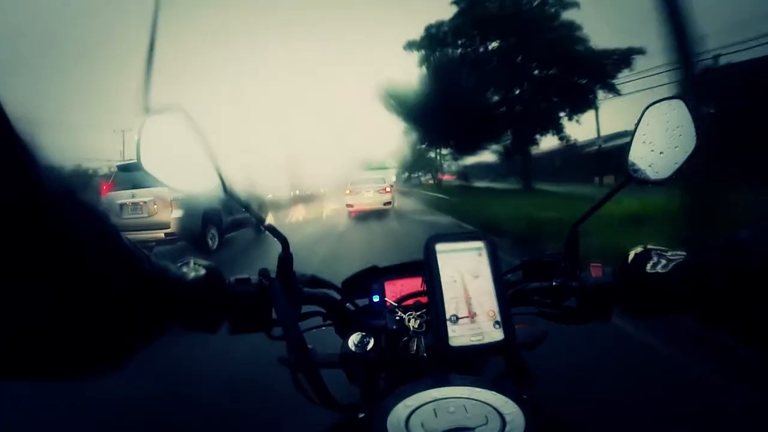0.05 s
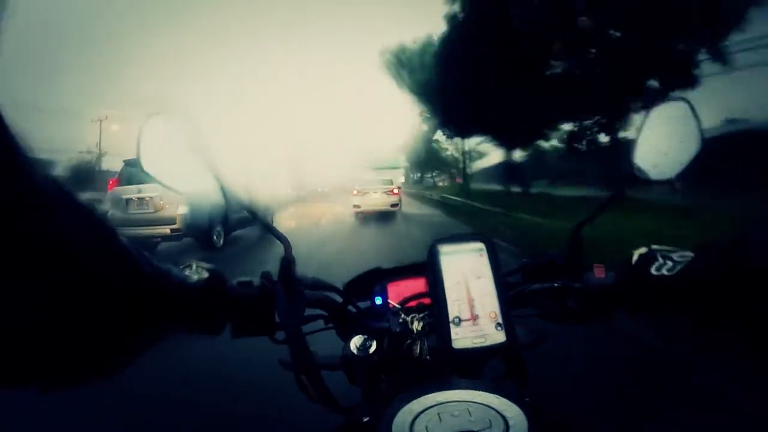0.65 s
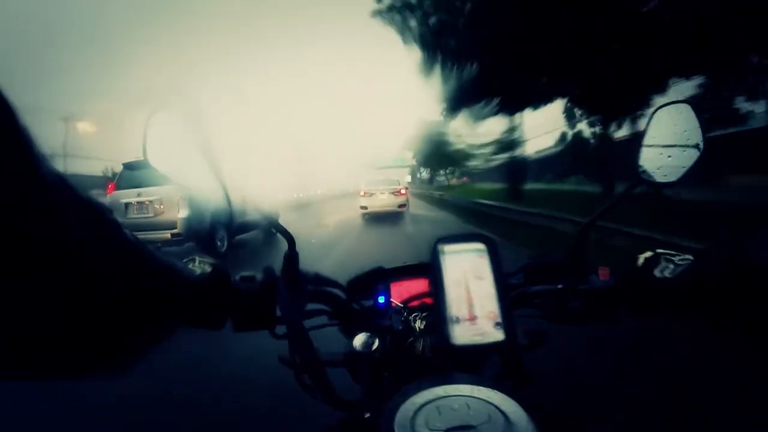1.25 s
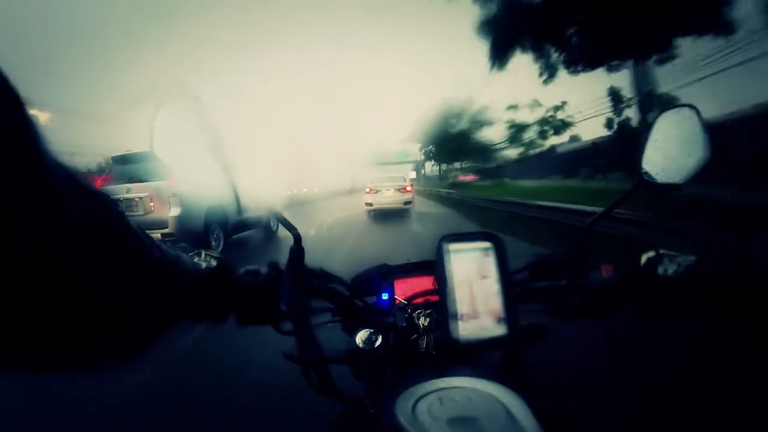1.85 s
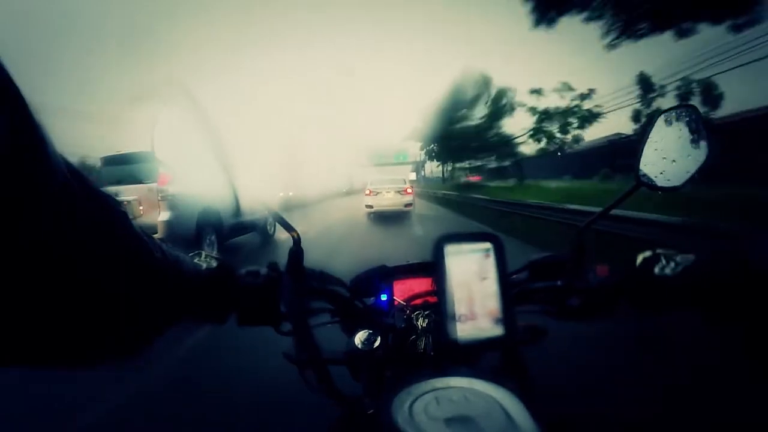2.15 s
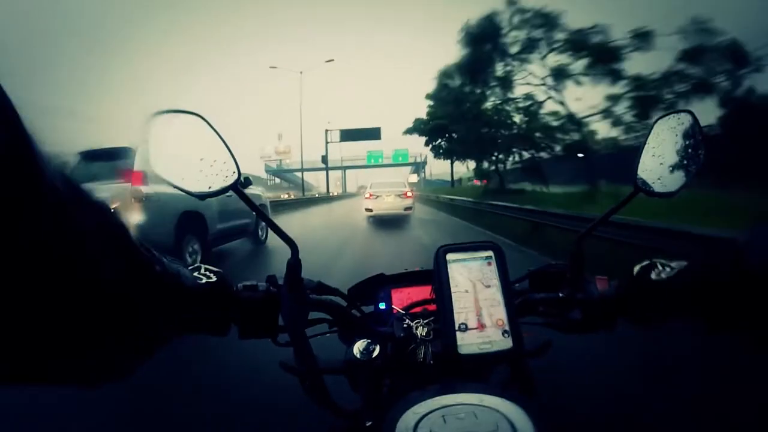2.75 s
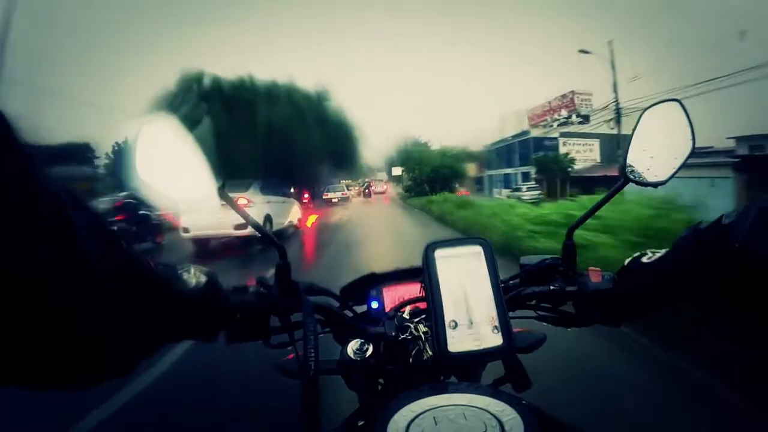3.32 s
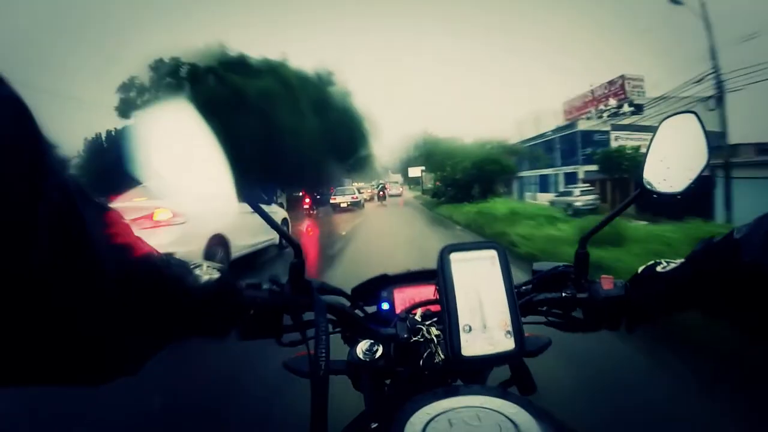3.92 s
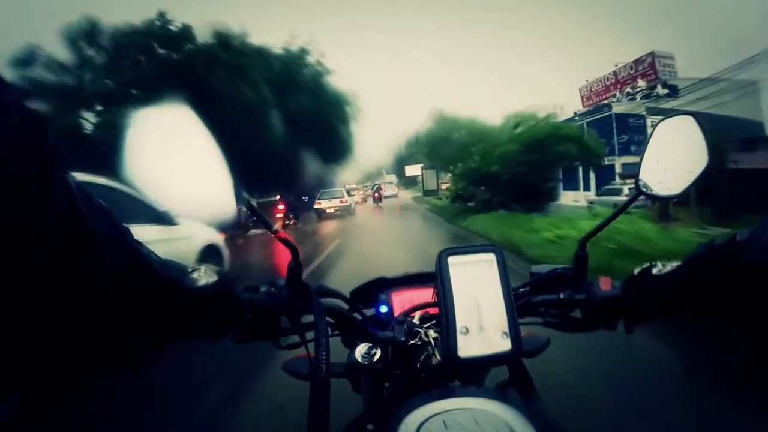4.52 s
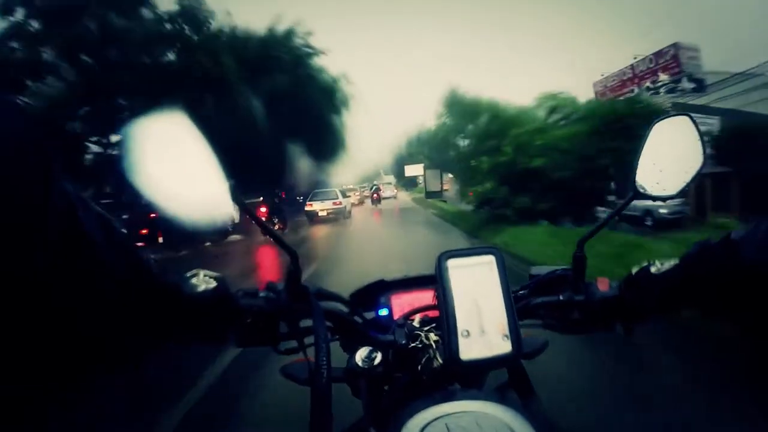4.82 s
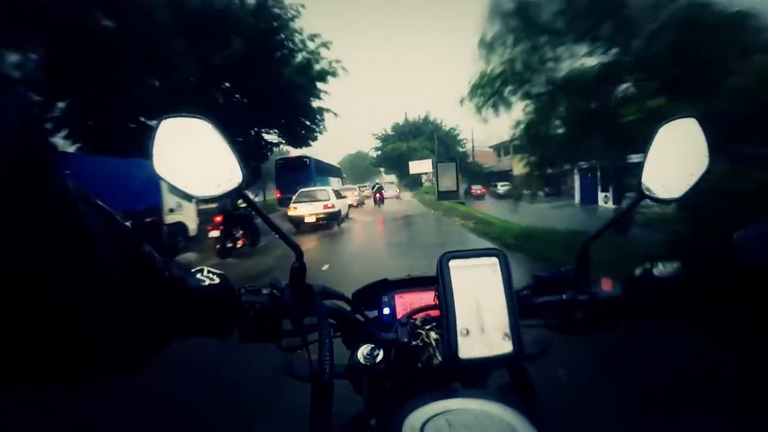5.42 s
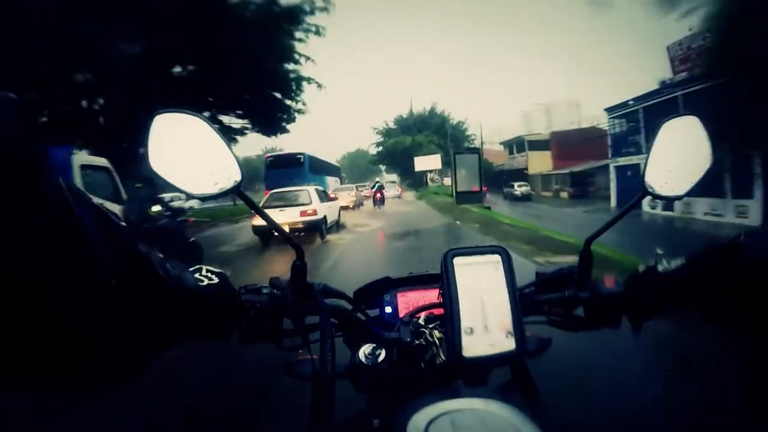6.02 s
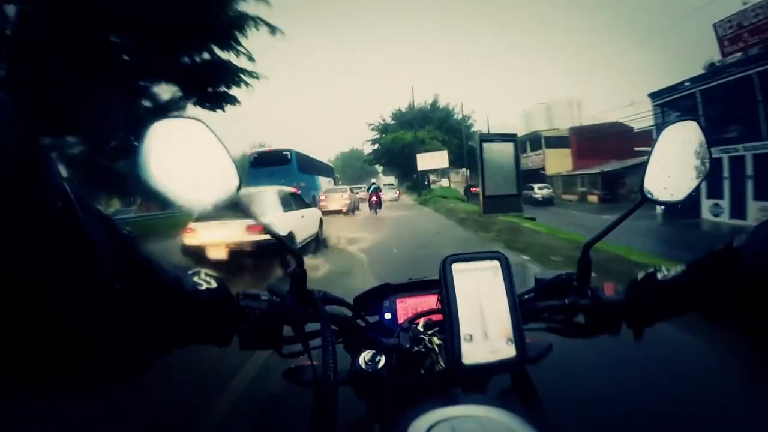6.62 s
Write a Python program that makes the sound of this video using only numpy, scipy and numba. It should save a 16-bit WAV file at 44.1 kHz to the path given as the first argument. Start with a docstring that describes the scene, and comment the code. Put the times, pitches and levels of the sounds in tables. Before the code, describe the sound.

Heavy rain strikes the case of a camera on a motorcycle riding through town. Sharp, close snaps land irregularly throughout, the hardest briefly overloading the microphone, with lighter ticks and fine crackling spray between them. A few hollow knocks and dull bumps of air come through. Heard from inside the case, wet tyre hiss, low wind and a very faint, uneven engine drone stay muffled in the background.

```python
"""Sharp snaps of heavy rain strike the case of a camera on a motorcycle riding through town.
Each drop is an impact that rings the wall for a moment, and the hardest overload the microphone.
Fine spray crackles in between, with a few hollow knocks and dull bumps of air. The case filters the
outside, so wet tyre hiss, buffeting wind and a dull, uneven engine drone arrive muffled."""
import sys
import numpy as np
from scipy import signal
from scipy.fft import rfft, irfft
from scipy.io import wavfile
from scipy.ndimage import uniform_filter1d
from numba import njit

SR = 44100
rng = np.random.default_rng(int(sys.argv[2]) if len(sys.argv) > 2 else 0)


def generate_wav(signal):
    """Clip the signal to [-1, 1] and save it as 16-bit WAV at the path in sys.argv[1]."""
    frames = np.transpose(np.atleast_2d(signal))
    scaled = np.clip(frames, -1, 1) * 32767
    pcm = np.round(scaled).astype(np.int16)
    wavfile.write(sys.argv[1], SR, pcm)


N = 293706


def drop(hz, decay_s, splash_db, grit, splash_s=0.00053, shiver_s=0.0042, shiver_db=-18):
    """Impact excitation: the struck spot rings as a damped mode, the water bursts, the wall shivers."""
    t = np.arange(len(grit)) / SR
    ring = np.exp(-t / decay_s) * np.sin(2 * np.pi * hz * t)
    splash_hz = min(6700 * (.0005 / decay_s) ** 0.26, 12500)  # a sharper hit sprays finer
    burst = resonate(grit * np.exp(-t / splash_s), splash_hz, width_hz=splash_hz / 0.78)
    splash = 4.03 * undb(splash_db) * burst / np.linalg.norm(burst)
    shiver = resonate(grit * np.exp(-t / shiver_s), hz=1640, width_hz=730)
    shiver *= undb(shiver_db) * np.linalg.norm(ring) / np.linalg.norm(shiver)
    return ring + splash + shiver


def rain(swell_db, thud_hz=202, thud_s=0.00028):
    """Superposition of impacts: each drop gives a snap and, by pushing the wall in, a thud."""
    # The clearest drops; splash and thud are relative to the drop's level:
    # (time [s], level [dB], ring frequency [Hz], ring time constant [s], splash [dB], thud [dB])
    clear_drops = [(0.0547, 10.0, 1930, 0.00072, -12.5, -24), (0.1815, -8, 2800, 0.00064, -7.5, -25),
                   (0.3181, -11.5, 1840.0, 0.00017, -1, -3), (0.326, 0.5, 4430, 0.00044, -6, -15),
                   (0.335, -6.5, 2520, 0.00084, -5, -28.0), (0.3689, -8, 2570, 0.00036, -1, -7),
                   (0.423, -6.5, 4220, 0.00052, -8.0, -8), (0.4729, -11, 2420, 0.00035, -6, -22.0),
                   (0.5539, 5, 3580, 0.00031, -19.5, -7), (0.662, 3.0, 4530, 0.00041, -11.5, -5.5),
                   (0.7104, 7, 3940, 0.00006, -32, -7.5), (0.7152, 5.0, 4160, 0.00034, -15, -20),
                   (0.726, -13.5, 2520, 0.00056, -5, -7), (0.763, -19, 2280, 0.0005, -2, -17),
                   (0.7732, -12.5, 5930, 0.00062, -17, -36.0), (0.7887, -10, 5500, 0.00032, -8, -4),
                   (0.8649, 0, 2700.0, 0.00055, -3.5, -23), (0.9897, -3.5, 3200, 0.00023, -8, -6),
                   (1.0441, -10.5, 3420, 0.0005, -10, -21), (1.068, -19.5, 2210, 0.0028, -15.0, 14.5),
                   (1.1384, -1.5, 2650, 0.00044, -6.5, -11), (1.2022, -17.5, 3550.0, 0.00024, -4, -18.0),
                   (1.2262, -13, 4580.0, 0.0004, -5, -7), (1.2587, -19, 2000, 0.00135, -27, 8),
                   (1.3024, 4.5, 1470.0, 0.00011, -7.5, -7.5), (1.3389, -17, 960, 0.0013, 2, -4),
                   (1.3963, -3.5, 4500.0, 0.0006, -2.5, -11), (1.4253, -0.5, 2750.0, 0.0022, -2.5, -2),
                   (1.5007, -7, 1740, 0.0002, -12.0, -30.0), (1.6006, -17.5, 5340, 0.0014, -6, -6),
                   (1.6227, -12.5, 2410.0, 0.00021, -2, -24.0), (1.633, 9, 2720, 0.00041, -12.5, -8.5),
                   (1.6873, -4, 2250.0, 0.00041, -20, -9), (1.7058, 7, 2690, 0.00046, -14, -7),
                   (1.727, -12, 2540.0, 0.0003, -5, -32.0), (1.76, -19.5, 1770, 0.00076, -13, 2),
                   (1.9381, -14, 1700.0, 0.00023, -9, -2), (1.9836, -13, 2520.0, 0.00023, -1.5, -1.5),
                   (2.0315, -8, 2450.0, 0.00023, -8, -13), (2.0428, -2, 2010, 0.00089, -11.5, -8),
                   (2.2358, 2.5, 4100, 0.00033, -13, -0.5), (2.2819, -10.5, 4600, 0.00077, -2.5, -30.0),
                   (2.3538, -16, 2650.0, 0.00047, -9, -36.0), (2.4185, 1.5, 4600.0, 0.00038, -12, -14.0),
                   (2.4787, -11, 1860.0, 0.00034, -0.5, 6), (2.5406, -7.5, 2240, 0.00073, -1.0, -6),
                   (2.573, -9, 4430.0, 0.00026, 2, -16.0), (2.6058, -6.5, 2500, 0.0018, 2.5, -21),
                   (2.6601, 3, 3030, 0.00021, -3, -26), (2.689, 3.5, 3630, 0.00016, -24, -21),
                   (2.7619, 4.5, 2740, 0.00035, -6, -19), (2.8616, 7, 1965, 0.0011, -18, -26),
                   (2.8854, 11.5, 2200.0, 0.0004, -10, -9), (2.9926, -3.5, 2020, 0.0011, -1.0, -6),
                   (3.1709, -13, 1850.0, 0.0002, -7, -17.0), (3.1868, -10.5, 1770, 0.00039, -11, 2.5),
                   (3.2242, -10, 4360, 0.00039, -25, -20), (3.2354, -10, 2320, 0.0009, -12, -24.0),
                   (3.2444, 3.5, 3700, 0.00037, -2.5, -35), (3.347, -11.5, 2850.0, 0.00021, -6, -34.0),
                   (3.3812, -10, 1710, 0.00057, -19.0, 2.5), (3.4122, -1, 2520.0, 0.00048, -5.5, -11),
                   (3.426, -9, 2300, 0.00066, -3, -29.0), (3.433, -8, 2020, 0.0019, -4, -24),
                   (3.5078, -1.5, 3790.0, 0.00016, -6, -4), (3.588, -9, 980, 0.00028, -14, -10),
                   (3.6811, -5, 2470, 0.00081, 1.5, -13), (3.716, -13.0, 2280, 0.00048, -6, -23.0),
                   (3.7629, -9.0, 1000.0, 0.00023, -19.0, -24.0),
                   (3.8043, -6.5, 4250.0, 0.00022, -2.5, -22), (3.8224, -17, 2620.0, 0.0006, -4, -3),
                   (3.8482, 3, 3450.0, 0.0006, -15, -19), (3.8764, 7, 2550, 0.00037, -11, -10),
                   (4.1349, 7.5, 2100, 0.00015, -13.5, -13), (4.163, -13.5, 1660.0, 0.0008, -14, -9),
                   (4.1706, -7, 2420.0, 0.00031, -1.5, -26), (4.2223, -8, 2070.0, 0.00138, -7.5, -14),
                   (4.2646, -9.5, 2600, 0.00039, -4, -32), (4.4816, 8.5, 2670, 0.000094, -17, -27),
                   (4.5291, -7.5, 2060.0, 0.00026, -13, -11), (4.5612, -11.5, 2110.0, 0.00014, -3, -23.0),
                   (4.585, -18, 3560, 0.00094, -6.0, -13), (4.7213, -6, 4470, 0.00048, -2.5, -19),
                   (4.8049, -0.5, 1610, 0.00027, -17, -28), (4.851, -3.5, 1810.0, 0.0002, -12, -25.0),
                   (4.8874, -8.5, 2290.0, 0.00031, -24, -4), (5.0236, 3, 2630.0, 0.000083, -22, -2),
                   (5.0488, -11, 1970, 0.00099, -4, 2), (5.0705, 11.5, 1260, 0.0005, -22, -15),
                   (5.1609, -13.5, 1670.0, 0.00091, -27, 7), (5.1885, -14.5, 2760.0, 0.00023, -8.0, -3),
                   (5.2749, -0.5, 2200, 0.00069, -16, -17), (5.349, -4, 1980, 0.0012, -14.5, -15),
                   (5.4271, 0, 2760, 0.00041, -7.5, -32.0), (5.4862, -6, 1800.0, 0.00019, -21, -3.0),
                   (5.527, -1, 2040, 0.00077, -3.5, -22), (5.5816, -14.5, 2620, 0.00054, -24.0, -34.0),
                   (5.6604, -14.5, 2720.0, 0.00024, -9, -7), (5.8684, -2, 2700, 0.0005, -6.5, -11),
                   (5.9073, -0.5, 4430.0, 0.00036, -7, -8), (6.0117, 6.5, 2660, 0.00028, -13.5, -10),
                   (6.1262, -17, 2460, 0.00041, -6, -10), (6.1682, -13.0, 2400, 0.00063, -1.5, -22.0),
                   (6.289, -3, 2210, 0.00041, -7, -8), (6.4147, -17.5, 3500, 0.0008, -10, -6),
                   (6.5597, -5, 4200, 0.00028, -11.5, -13)]
    drops = np.vstack([clear_drops, light_drops(swell_db)])
    snaps, thuds = np.zeros(N), np.zeros(N)
    t = np.arange(600) / SR
    push = np.exp(-t / thud_s) * np.sin(2 * np.pi * thud_hz * t)
    grits = rng.standard_normal((len(drops), len(t)))
    for (s, db, hz, decay_s, splash_db, thud_db), grit in zip(drops, grits):
        add(snaps, s, undb(db) * drop(hz, decay_s, splash_db, grit))
        add(thuds, s, undb(db + thud_db) * push)
    return snaps, thuds


def light_drops(swell_db, count=480, range_db=18.5, rarity=7.8, middle_hz=2910, octaves=1.57):
    """A random point process whose rate and level follow the hiss. Returns rows like clear_drops."""
    lateness, size, pitch = rng.random((count, 3)).T
    ring, splash, thud = rng.standard_normal((count, 3)).T
    fallen = np.cumsum(undb(.6 * swell_db))  # running integral of the drop rate
    share = (np.arange(count) + 4 * lateness) % count / count
    onset = np.searchsorted(fallen, share * fallen[-1])
    db = -15.5 + range_db * (size ** rarity - 1) + .5 * swell_db[onset]  # strong drops are rare
    hz = middle_hz * 2 ** (octaves * (pitch - .5))
    decay_s = 0.00043 * np.exp(0.29 * ring)
    splash_db, thud_db = -2.5 + 2 * splash, -13.5 + 4 * thud
    return np.column_stack([onset / SR, db, hz, decay_s, splash_db, thud_db])


def spatters(burst_s=0.0083):
    """Fragmentation: a shattered drop showers the case with droplets for a few milliseconds."""
    # Drops that shatter: (time [s], level [dB])
    bursts = [(0.03, -30.5), (0.113, -34), (0.701, -27), (2.483, -26), (2.785, -28), (3.188, -27),
              (4.952, -29), (5.05, -23)]
    t = np.arange(N) / SR
    envelope = sum(undb(db) * np.exp(-2 * np.abs(t - s) / burst_s) for s, db in bursts)
    droplets = patter(per_s=9000, spread_db=0.91)
    return envelope * unit(resonate(droplets, hz=850, width_hz=1700))


def case(x, echo_s=0.001622, echo_db=-12, cavity_db=-12):
    """Reflection, dispersion, resonance: snaps bounce round the case, its wall smears them, air rings."""
    # Transmission from the case to the microphone: (frequency [Hz], gain [dB])
    transmission = [(200, -24.5), (700, -11.5), (1100, -6.5), (1500, 1.97), (1850, 2.5), (2150, 3),
                    (2550, 5), (3100, -0.6), (3800, -4.5), (5300, 1.5), (7500, -14), (9500, -11),
                    (12500, -24), (15500, -25)]
    hz = np.arange(N + 1) * SR / (2 * N)
    bounces = 1 / (1 - undb(echo_db) * np.exp(-2j * np.pi * hz * echo_s))
    echoed = irfft(rfft(x, 2 * N) * bounces)[:N]
    smeared = echoed - 2 * resonate(echoed, hz=2400, width_hz=2200)  # all-pass: the middle arrives late
    cavity = undb(cavity_db) * resonate(smeared, hz=1870, width_hz=160)
    return colour(smeared + cavity, transmission)


def knocks(bump_cycles=0.36):
    """Modal decay: knocks ring hollow notes of the case body; bumps of air die in a cycle or two."""
    # Knocks on the body: (time [s], level [dB])
    strikes = [(.553, -33), (.712, -39), (1.335, -47), (2.69, -42.5), (5.157, -48)]
    # Modes of the body: (frequency [Hz], level [dB], time to fall 60 dB [s])
    modes = [(663, 5.5, 0.093), (780, 7, 0.057), (975, 15, 0.018)]
    # Bumps of air on the case: (time [s], relative level [dB], frequency [Hz])
    bumps = [(0.03, -20.5, 210), (0.32, -23, 154), (0.545, -22, 253), (1.328, -21, 138), (1.471, -22, 190),
             (2.237, -26, 134), (2.252, -26, 119), (2.78, -20, 250), (3.379, -24, 72), (3.59, -22.5, 140),
             (4.868, -26, 58)]
    out, t = np.zeros(N), np.arange(SR // 5) / SR
    note = sum(undb(db - 60 * t / t60) * np.sin(2 * np.pi * hz * t) for hz, db, t60 in modes)
    for s, db in strikes:
        add(out, s, undb(db) * note)
    for s, db, hz in bumps:
        add(out, s, 1.5 * undb(db) * np.exp(-t * hz / bump_cycles) * np.sin(2 * np.pi * hz * t))
    return out


def spray(hiss_db, mist_db):
    """Shot noise: countless droplets merge into tyre hiss on the wet road and crackle on the case."""
    # Tyre hiss inside the case: (frequency [Hz], level [dB])
    hiss_spectrum = [(250, -7), (480, -8.5), (650, -19), (900, 3.5), (1200, -1.5), (1550, 14), (1720, 6),
                     (1870, -4), (2150, 10), (2550, 6.5), (3300, -17), (5400, -39), (7000, -31),
                     (15000, -40)]
    # Fine mist inside the case: (frequency [Hz], level [dB])
    mist_spectrum = [(800, -23), (2000, 10), (3500, 6), (5400, 4), (6500, -2), (7800, -13.5), (9600, -9),
                     (11500, -20), (13500, -13), (15500, -50)]
    road_water = rng.standard_normal(N) + 1.9 * patter(per_s=1500, spread_db=6.1)
    hiss = unit(colour(road_water, hiss_spectrum))
    droplets = rng.standard_normal(N) + 1.3 * patter(per_s=1200, spread_db=5)
    mist = unit(colour(droplets, mist_spectrum))
    flutter_db = 1.2 * walk(rate_hz=30)
    return hiss * undb(hiss_db - 1.25 + flutter_db) + mist * undb(mist_db + 1.5 + flutter_db)


def wind():
    """Turbulence: eddies buffet the case in uneven, low-pitched puffs."""
    # Wind inside the case: (frequency [Hz], level [dB])
    spectrum = [(15, -23), (40, 0), (70, 0.5), (130, 3), (200, -3), (300, -7.5), (450, -12), (900, -14.5),
                (3000, -53.5)]
    # Strength of the wind on the case: (time [s], relative level [dB])
    buffets = [(0.0, -51), (0.63, -48.5), (0.89, -53), (1.89, -53.5), (2.19, -49), (2.82, -53.5),
               (3.15, -50), (3.52, -47), (3.71, -45.5), (3.86, -50.5), (4.01, -55.5), (4.64, -50.5),
               (4.9, -48), (5.49, -54), (6.27, -53.5), (6.66, -47)]
    wind_db, = follow(buffets)
    eddies = rng.standard_normal(N) + .9 * patter(per_s=120, spread_db=3)
    swirl_db = 2 * walk(rate_hz=14)
    return unit(colour(eddies, spectrum)) * undb(wind_db + 2.5 + swirl_db)


def engine(firing_hz=41.1, exhaust_hz=150, width_hz=180, level_db=-64):
    """Forced resonance: a train of uneven firings drives the boom of the exhaust."""
    cycles = np.cumsum(firing_hz * (1 + .03 * walk(rate_hz=10))) / SR
    firings = np.diff(np.floor(cycles), prepend=0) * undb(3.8 * walk(rate_hz=40))
    boom = resonate(firings, exhaust_hz, width_hz)
    return undb(level_db) * unit(resonate(boom, exhaust_hz, width_hz))


def patter(per_s, spread_db):
    """Poisson impacts, most of them tiny and a few strong; rms 1."""
    hit = rng.random(N) < per_s / SR
    size = undb(spread_db * np.minimum(rng.exponential(size=N), 4))
    return unit(hit * size * rng.choice([-1, 1], N))


def walk(rate_hz):
    """Slow random modulation: straight ramps between random values; rms 1."""
    step = int(SR / rate_hz)
    stairs = np.repeat(rng.standard_normal(N // step + 1), step)
    return unit(uniform_filter1d(stairs, step)[:N])


def resonate(x, hz, width_hz):
    """Second-order resonance with gain 1 at its centre and a Q of at least 0.5."""
    return signal.lfilter(*signal.iirpeak(hz, max(hz / width_hz, .5), fs=SR), x)


def colour(x, points, size=4096):
    """Minimum-phase filter through points of (frequency [Hz], gain [dB])."""
    hz, db = np.transpose(points)
    bin_hz = np.arange(size // 2 + 1) * SR / size
    gain = undb(np.interp(np.log(bin_hz + 1), np.log(hz), db))
    cepstrum = irfft(np.log(gain))
    cepstrum[1:size // 2] *= 2  # folding onto positive time makes the filter causal
    cepstrum[size // 2 + 1:] = 0
    impulse_response = irfft(np.exp(rfft(cepstrum)))
    return signal.fftconvolve(x, impulse_response)[:len(x)]


@njit
def held_peak(x, fall):
    """Envelope detection: follows each peak at once, then decays exponentially."""
    out, peak = np.empty(len(x)), 0.
    for i in range(len(x)):
        peak = max(abs(x[i]), peak * fall)
        out[i] = peak
    return out


def follow(table):
    """Linear interpolation of rows of (time [s], values ...) into one curve per value."""
    s, *columns = np.transpose(table)
    return [np.interp(np.arange(N) / SR, s, column) for column in columns]


def add(track, s, sound):
    """Superpose a sound on a track, starting at s seconds."""
    i = max(int(s * SR), 0)
    track[i:i + len(sound)] += sound[:max(N - i, 0)]


def undb(db):
    """Decibels to amplitude ratio."""
    return 10 ** (np.asarray(db) / 20)


def unit(x):
    """Normalise to rms 1."""
    return x / np.sqrt(np.mean(x ** 2))


def scene(average_hiss_db=-45, low_cut_hz=86):
    """Superposition of rain and the noise of the ride; the light drops follow the level of the hiss."""
    # Background hiss and crackle, swelling and then dipping after the hardest drops:
    # (time [s], relative hiss level [dB], relative mist level [dB])
    background_levels = [(0.0, -45, -47), (0.28, -44, -53.5), (0.57, -41, -47), (0.93, -46, -52),
                         (1.39, -42, -49), (1.78, -46, -54), (2.35, -41, -45.5), (2.69, -42, -53.5),
                         (2.91, -46, -54), (3.24, -46, -53.5), (3.38, -44, -49.5), (3.73, -38, -48),
                         (3.91, -49.5, -54.5), (4.54, -46, -53.5), (5.01, -41, -45), (5.34, -42, -54.5),
                         (5.71, -48, -54.5), (6.66, -43, -49.5)]
    hiss_db, mist_db = follow(background_levels)
    snaps, thuds = rain(swell_db=hiss_db - average_hiss_db)
    low_cut = signal.butter(1, low_cut_hz, "highpass", fs=SR, output="sos")
    blows = signal.sosfilt(low_cut, thuds + knocks())
    return (case(snaps + spatters()) + blows + spray(hiss_db, mist_db) + wind() + engine())[None]


def record(dry, threshold_db=-2, attack_s=0.0022, release_s=.06, depth=.6, top_hz=15600):
    """Compression and saturation: gain control lags a hard drop, which clips; the rain behind it ducks."""
    peak = held_peak(dry[0], np.exp(-1 / (release_s * SR)))
    excess_db = 20 * np.log10(np.maximum(peak / undb(threshold_db), 1))
    slew = np.exp(-1 / (attack_s * SR))
    lagged_db = signal.lfilter([1 - slew], [1, -slew], excess_db)
    ducked = dry * undb(-depth * lagged_db)
    clipped = ducked / (1 + ducked ** 8) ** (1 / 8)
    low_pass = signal.ellip(8, .2, 70, top_hz, fs=SR, output="sos")
    return signal.sosfilt(low_pass, clipped)


dry = scene()
out = record(dry)
generate_wav(out)
```